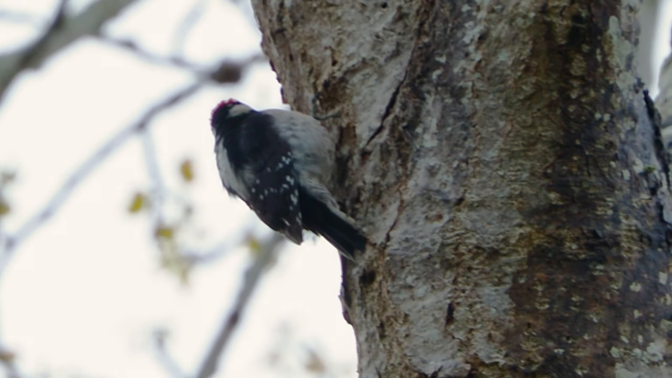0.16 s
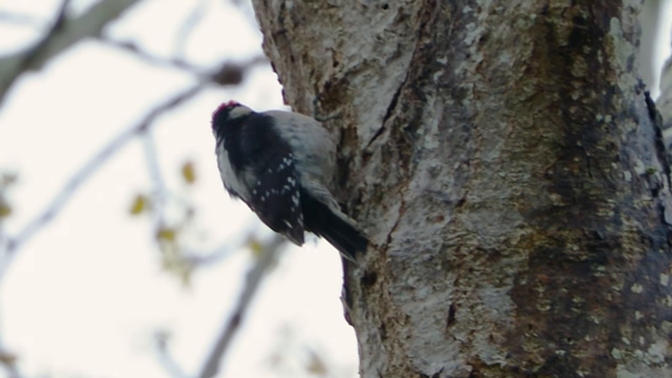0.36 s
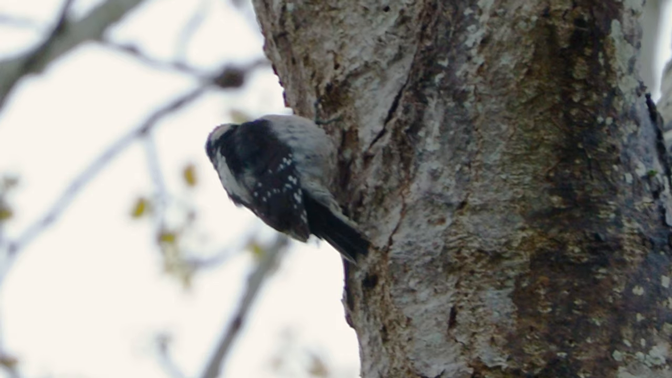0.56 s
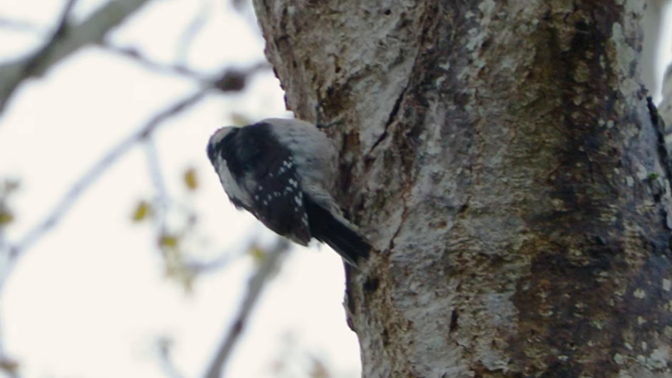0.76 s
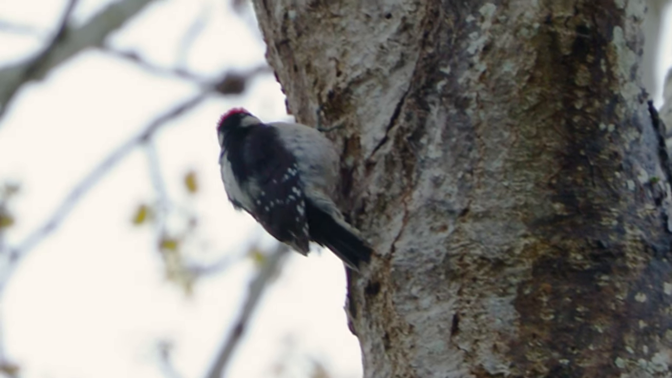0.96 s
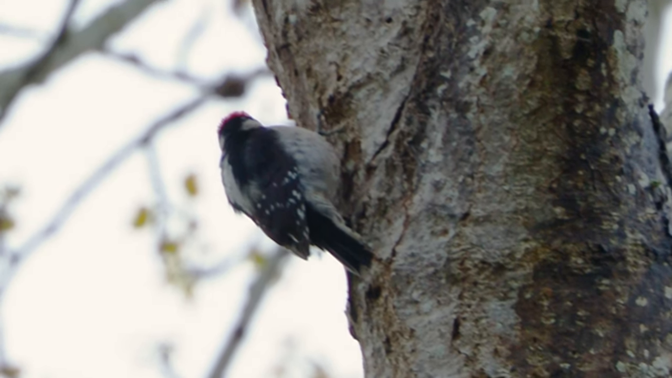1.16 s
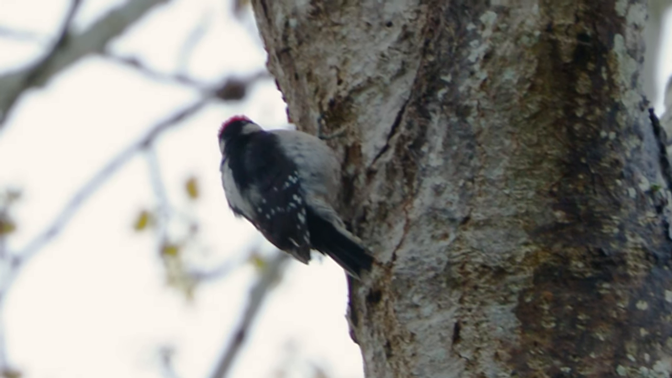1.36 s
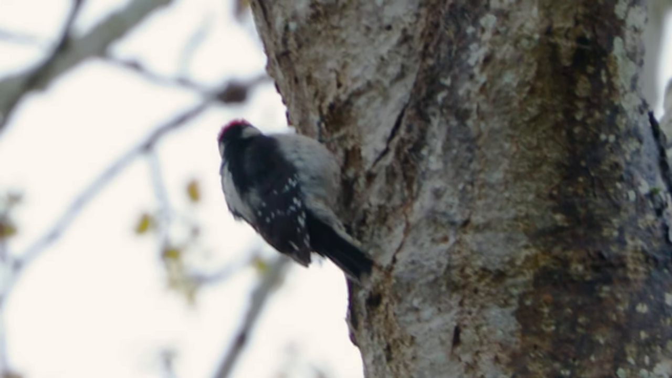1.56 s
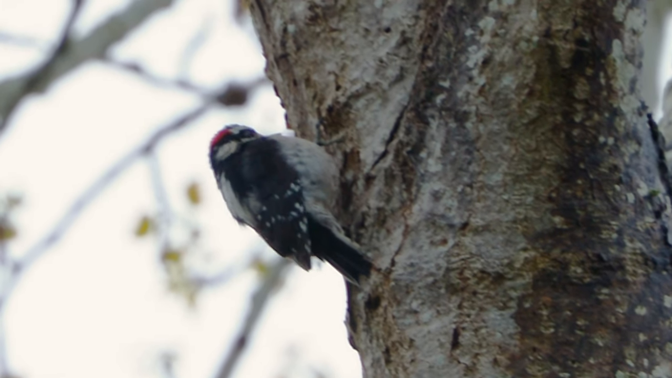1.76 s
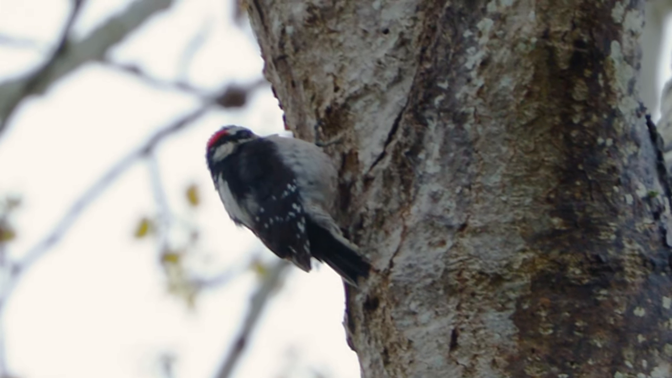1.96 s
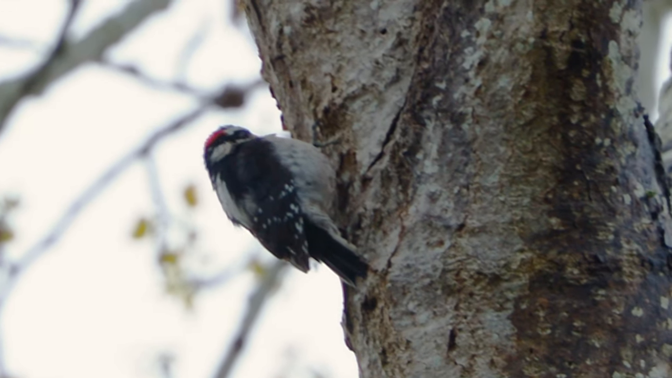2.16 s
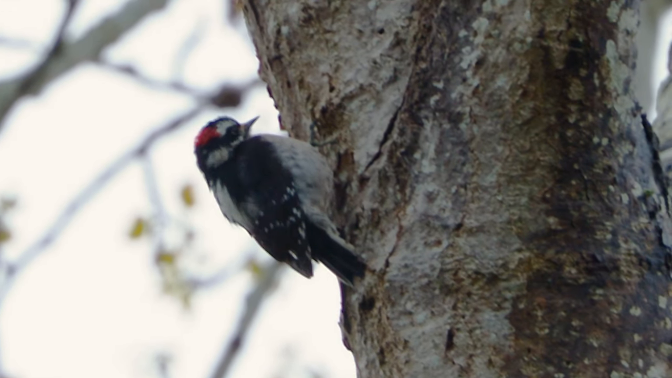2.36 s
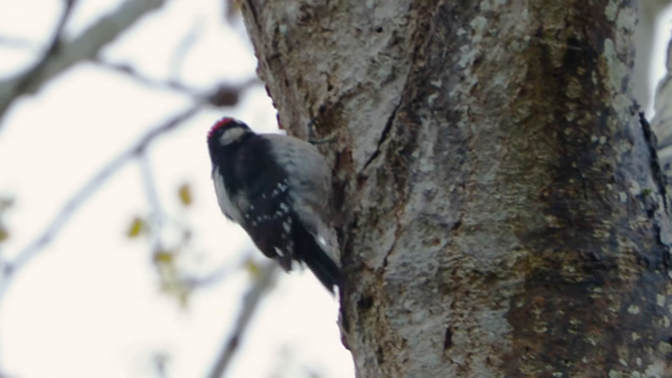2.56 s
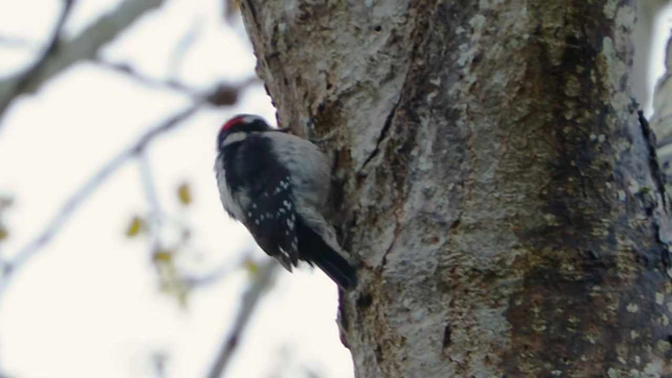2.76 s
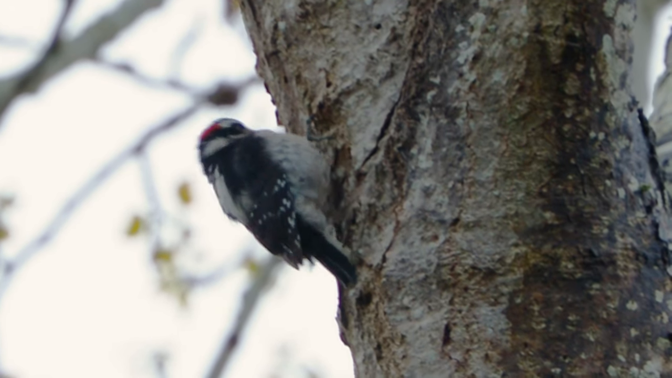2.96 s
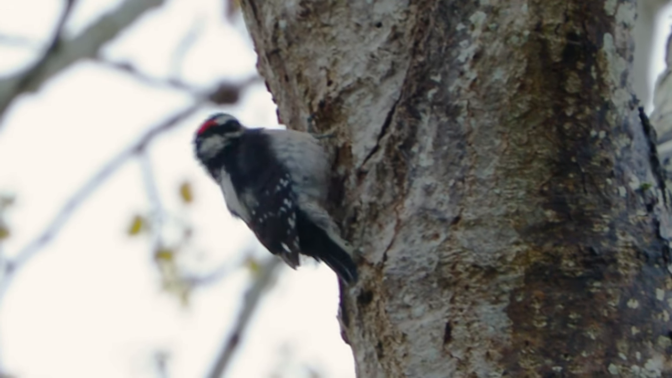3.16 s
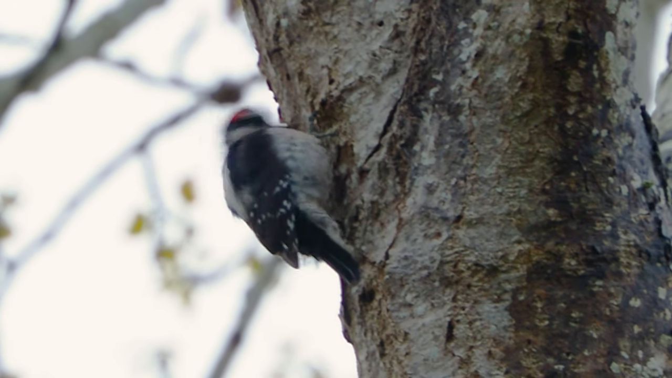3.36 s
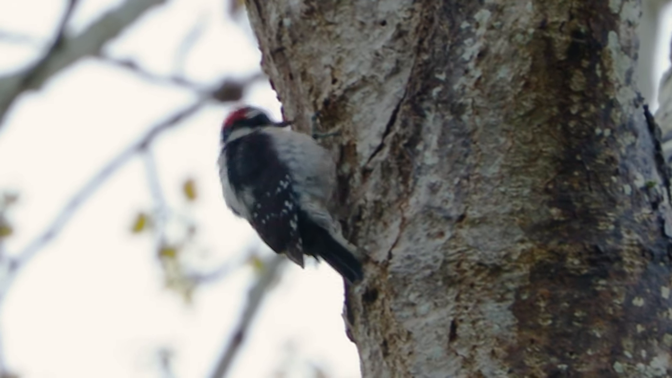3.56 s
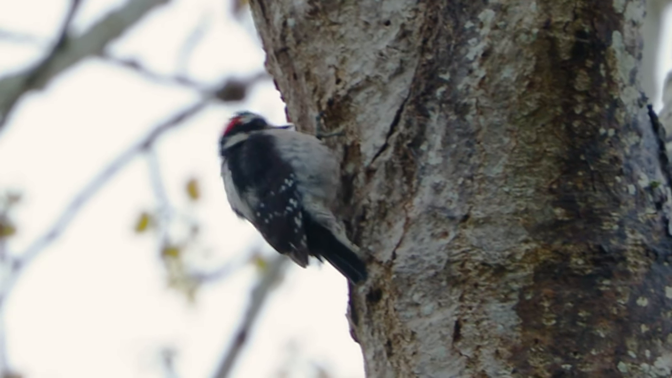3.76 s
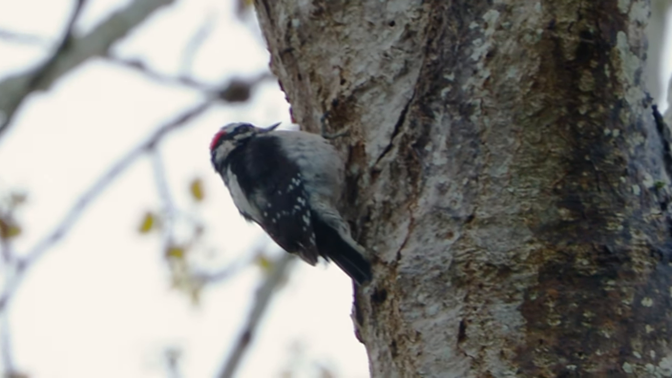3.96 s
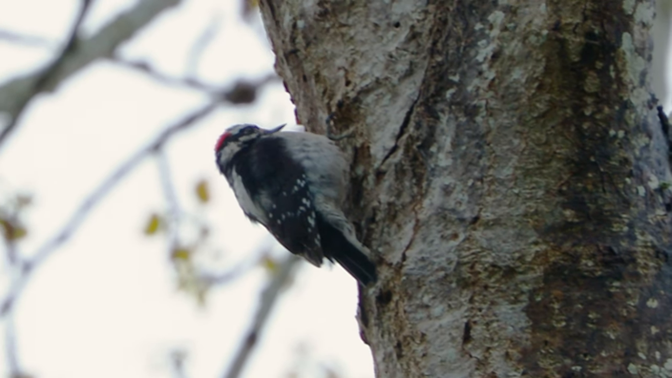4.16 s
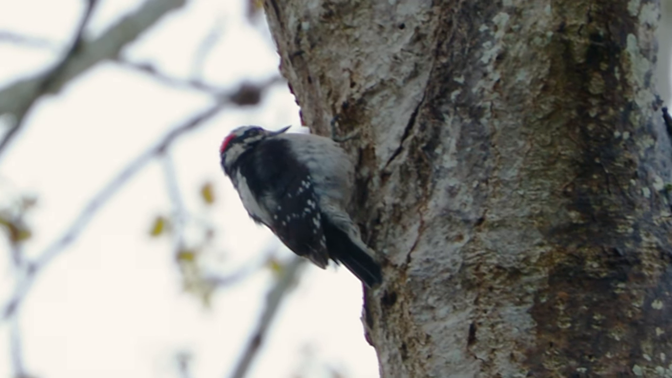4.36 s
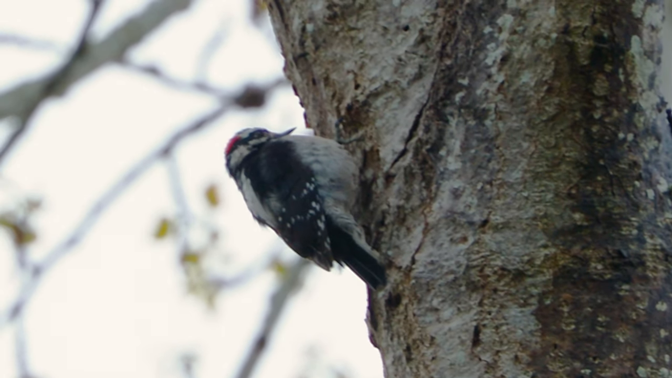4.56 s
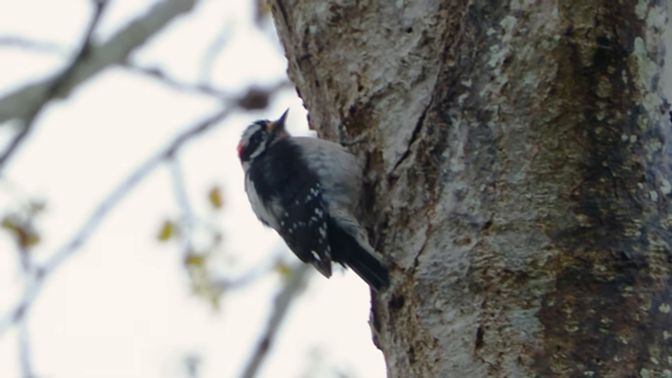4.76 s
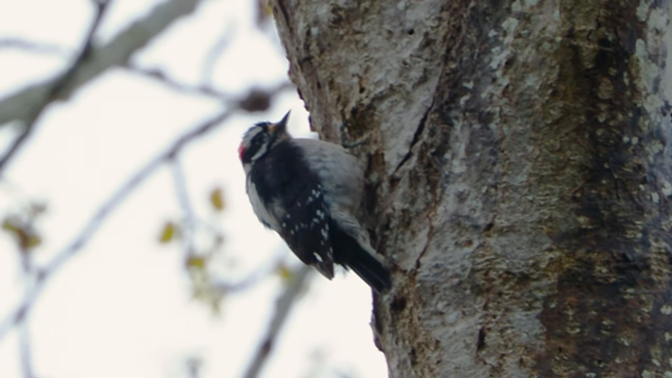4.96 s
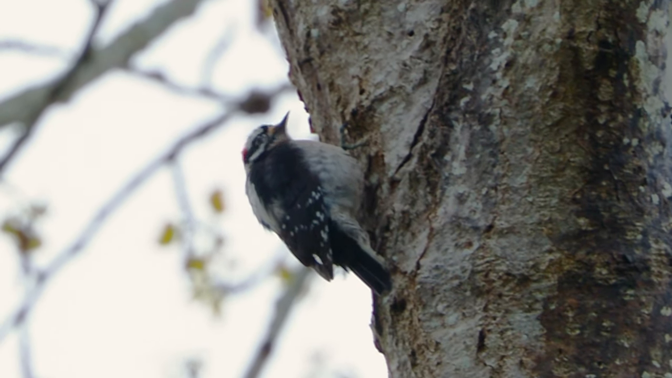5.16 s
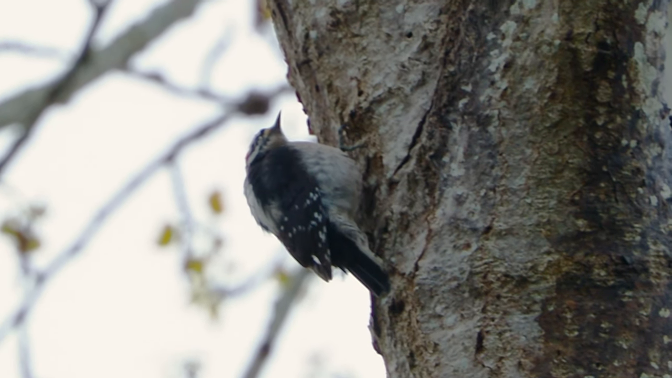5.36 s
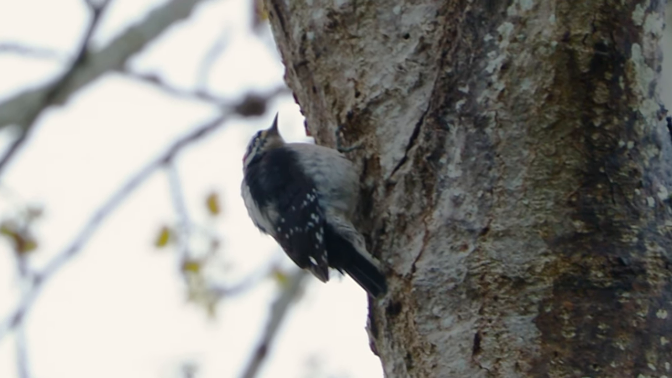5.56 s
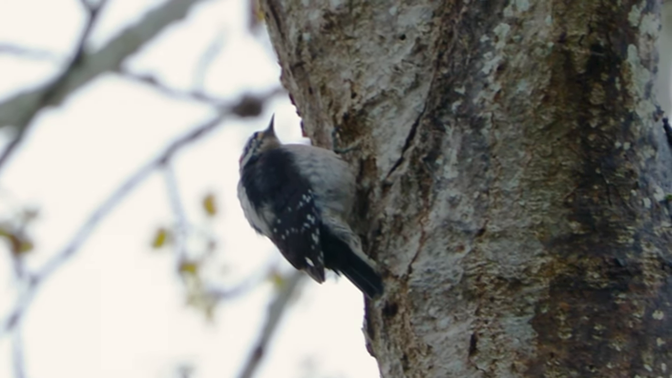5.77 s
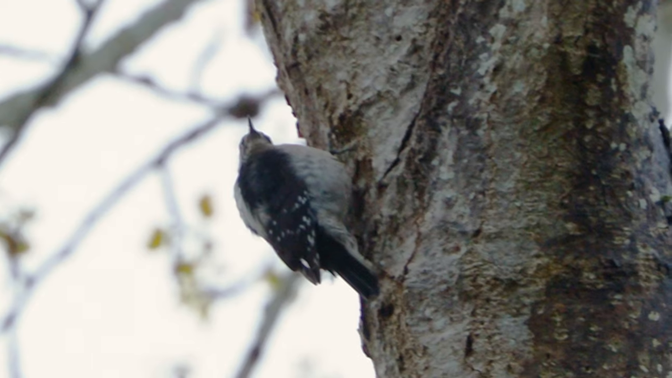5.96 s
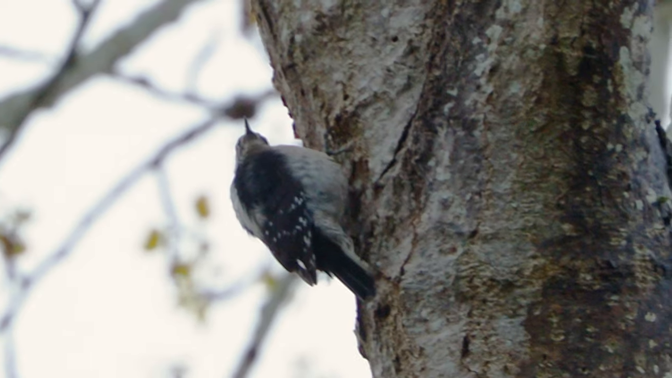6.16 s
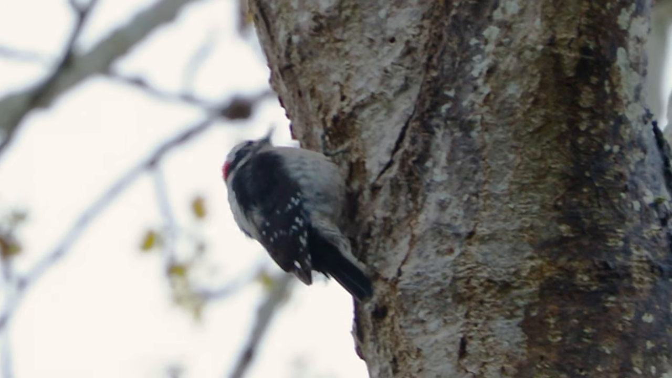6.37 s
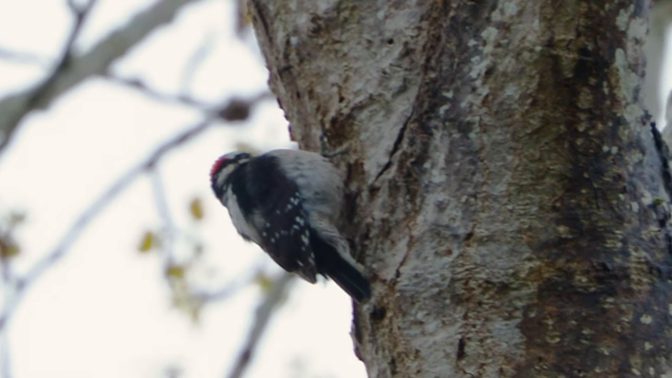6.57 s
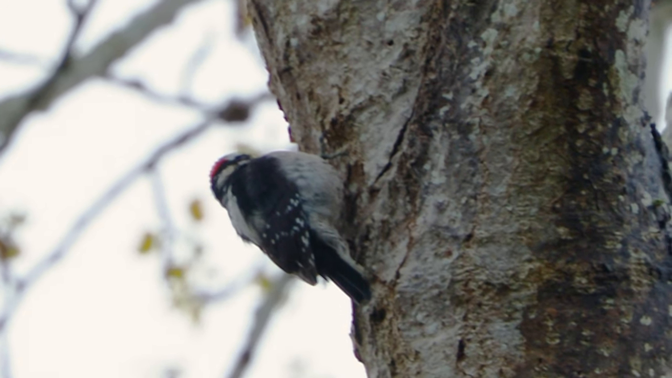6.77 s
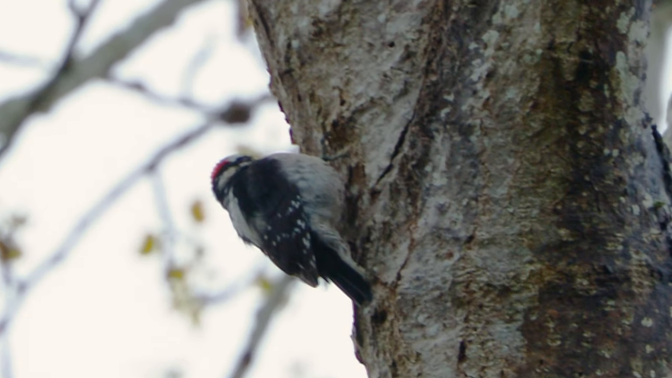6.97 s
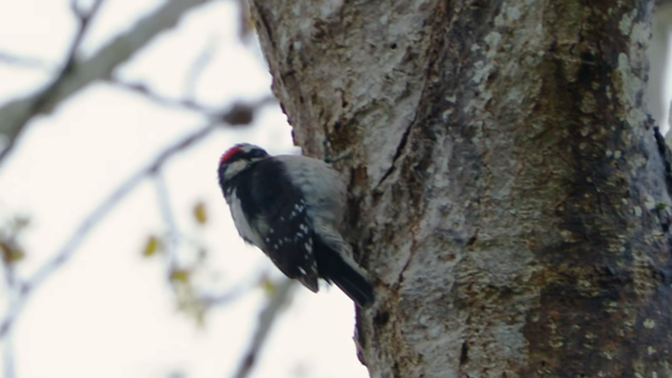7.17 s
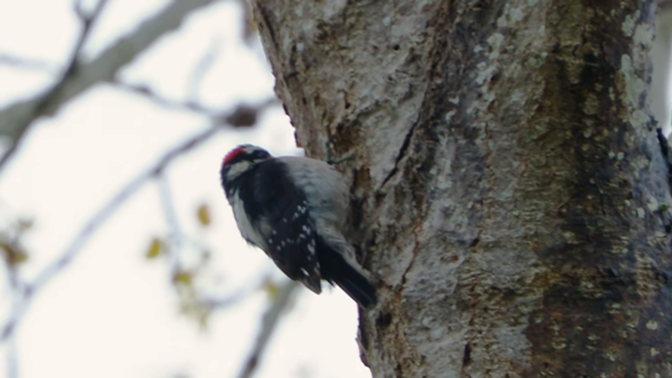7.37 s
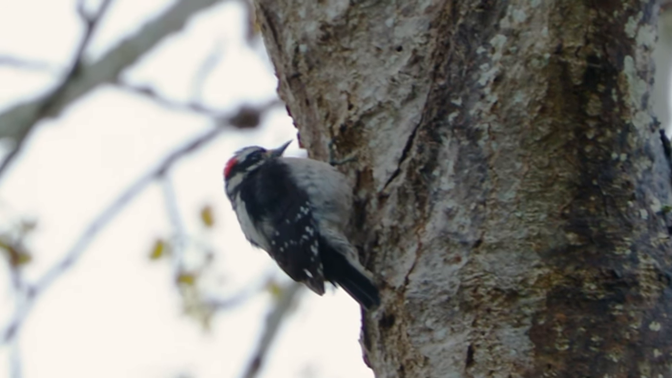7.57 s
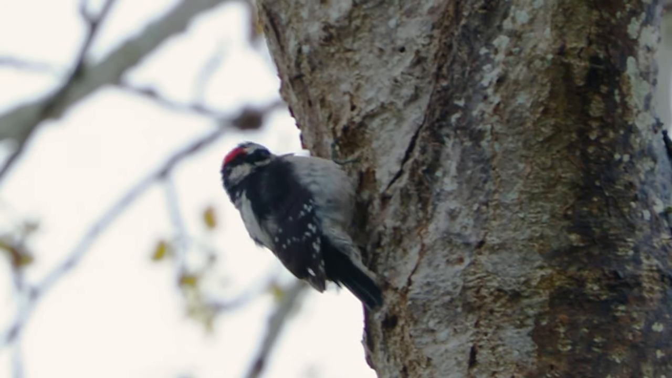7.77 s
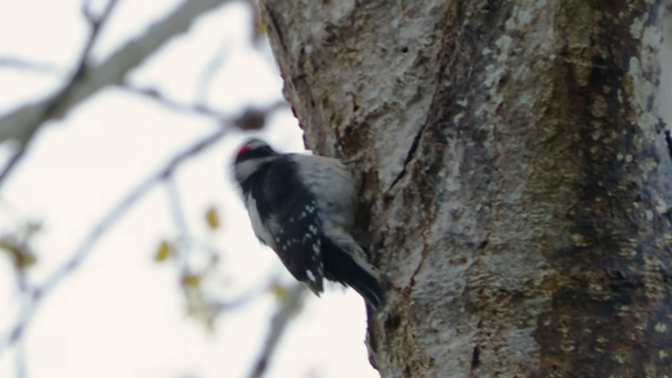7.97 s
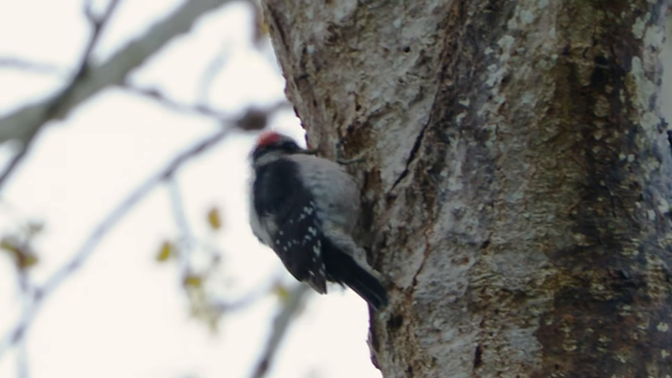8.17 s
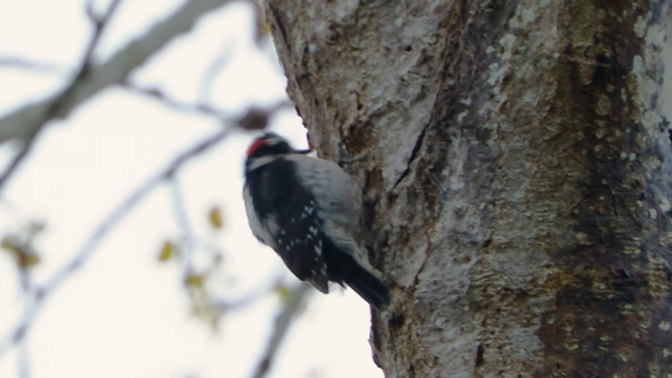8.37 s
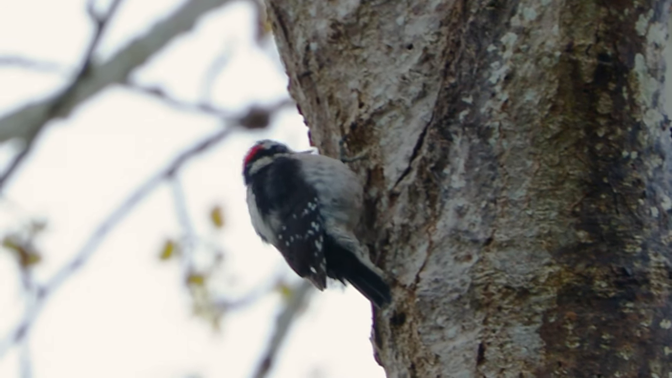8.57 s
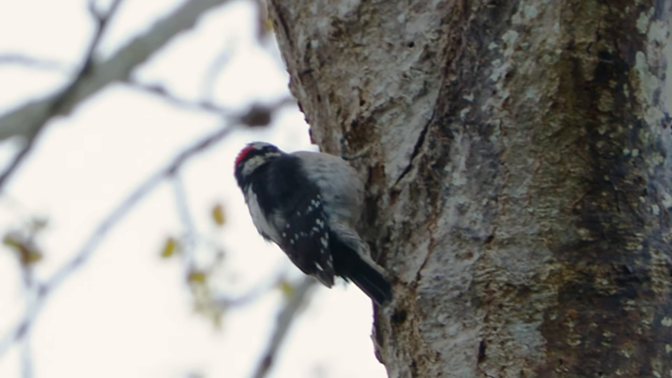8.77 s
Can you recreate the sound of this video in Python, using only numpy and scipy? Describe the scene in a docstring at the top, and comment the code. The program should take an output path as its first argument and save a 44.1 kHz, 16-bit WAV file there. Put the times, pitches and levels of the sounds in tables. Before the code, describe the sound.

A low rumble of distant traffic and a soft hiss of outdoor air run throughout, the traffic swelling slightly around 2.5 seconds. Small birds give faint high chips and whistles all along, with occasional tiny twig ticks. A far bird gives a faint, hoarse rising scream at 0.4 seconds, and there is brief twittering near 2.5. At 2.9 seconds a small woodpecker drums loudly on a resonant trunk for about a second, roughly sixteen blows a second, echoing briefly among the trees. Another faint scream follows at 4 seconds, and claws scrape softly on bark at 4.6. A dry trill at 5.2 leads into a clear rising note at 5.8 and a hoarse song of four repeated syllables until about 7 seconds. At 8 seconds the woodpecker drums a shorter roll, and a last distant scream rises behind it at 8.5.

```python
"""Distant traffic rumbles throughout. A twig ticks, a far bird screams, and songbirds chip, whistle and
twitter. Near 3 s a small woodpecker drums on a resonant spot of a trunk, sixteen blows a second: each
rings the wood, comes back from nearby surfaces and scatters among the trees. A second scream follows,
claws scrape the bark, and a dry trill leads into a hoarse song near 6 s. Near 8 s the woodpecker drums a
shorter roll, and a last scream rises behind it."""
import sys
import numpy as np
from scipy import signal
from scipy.fft import rfft, irfft, next_fast_len
from scipy.io import wavfile
from scipy.ndimage import uniform_filter1d

SR = 44100
rng = np.random.default_rng(int(sys.argv[2]) if len(sys.argv) > 2 else 0)


def inscribe(sig):
    """Save sig as 16-bit PCM at rate SR to the path in sys.argv[1].

    A 1-D sig is mono; a 2-D sig holds one channel per row.
    Samples are clipped to [-1, 1] before scaling.
    """
    pcm = np.round(np.clip(np.atleast_2d(sig).T, -1, 1) * 32767)
    wavfile.write(sys.argv[1], SR, pcm.astype(np.int16))


N = 388521


def undb(db):
    """Decibels to gain."""
    return 10 ** (np.asarray(db) / 20)


def level(x, db):
    """Scale to an rms level."""
    return x * undb(db) / np.sqrt(np.mean(x ** 2))


def clock(length):
    """Sample times of a sound, in seconds."""
    return np.arange(int(length * SR)) / SR


def decay(t, t60):
    """Envelope that falls 60 dB in t60 seconds."""
    return undb(-60 * t / t60)


def arch(t):
    """Envelope that swells and fades over a note."""
    return np.sin(np.pi * t / (t[-1] + 1 / SR))


def walk(rate, size):
    """Smooth random wander with a spread near 1."""
    hold = int(SR / rate)
    return uniform_filter1d(np.repeat(rng.standard_normal(size // hold + 1), hold), hold)[:size]


def tone(hz, waver):
    """A bird's voice: near pure when the pitch wavers little, hoarse when it wavers much."""
    return np.sin(2 * np.pi * np.cumsum(hz * (1 + waver * walk(900, len(hz)))) / SR)


def settle(t, start_hz, end_hz, glide):
    """A pitch that leaves its start quickly and levels off."""
    return end_hz + (start_hz - end_hz) * np.exp(-t / glide)


def s_bend(along, start_hz, end_hz, turn, width):
    """A pitch that dwells, bends and levels off; turn and width are shares of the note."""
    return start_hz + (end_hz - start_hz) / (1 + np.exp(-(along - turn) / width))


def add(out, start, sound, pan_db=0):
    """Mix a sound into a stereo track; pan is left minus right."""
    i = int(start * SR)
    part = np.atleast_2d(sound)[:, :max(N - i, 0)]
    out[:, i:i + part.shape[1]] += part * undb(np.array([[pan_db], [-pan_db]]) / 2)


def butter(x, hz, kind, order=2):
    """Butterworth filter."""
    return signal.sosfilt(signal.butter(order, hz, kind, fs=SR, output="sos"), x)


def colour(x, points, skirt_db=0):
    """EQ through (f/Hz, gain/dB) points, falling by skirt_db an octave beyond the ends."""
    size = next_fast_len(x.shape[-1])
    octave = np.log2(np.maximum(np.arange(size // 2 + 1) * SR / size, 1))
    hz, db = np.transpose(points)
    outside = np.abs(octave - np.clip(octave, np.log2(hz[0]), np.log2(hz[-1])))
    gain = undb(np.interp(octave, np.log2(hz), db) - skirt_db * outside)
    return irfft(rfft(x, size) * gain, size)[..., :x.shape[-1]]


def stereo_width(x, side_eq):
    """EQ the side signal: long waves reach both ears alike."""
    side = colour((x[0] - x[1]) / 2, side_eq)
    return x.mean(axis=0) + np.array([side, -side])


def from_right(x, samples):
    """Sound from the right reaches the left ear a little later."""
    return np.array([np.pad(x[0], (samples, 0))[:N], x[1]])


def trees(x, t60, wet_db, onset=.0015):
    """Reverb from trunks and branches: a fading cloud of echoes, different at each ear."""
    t = clock(1.2)
    fade_in = 1 - np.exp(-(t / onset) ** 2)
    cloud = rng.standard_normal((2, len(t))) * decay(t, t60) * fade_in
    cloud /= np.sqrt(np.sum(cloud ** 2, axis=1, keepdims=True))
    return undb(wet_db) * signal.fftconvolve(x, cloud, axes=1)[:, :N]


# stereo width of the ambience: f/Hz, side gain/dB
BED_WIDTH = [(60, -24.5), (110, -27), (200, -12), (380, -7.5), (700, -11.5), (1290, -12), (2380, 1.5),
             (4400, 4), (8120, 0), (15000, 3)]

def noise_bed(eq, skirt_db, side_db=0):
    """Shaped stereo noise with its mid signal at unit rms."""
    noise = colour(rng.standard_normal((2, N)), eq, skirt_db)
    bed = stereo_width(noise, [(hz, db + side_db) for hz, db in BED_WIDTH])
    return bed / bed.mean(axis=0).std()


# EQ of the low rumble and of the road noise: f/Hz, gain/dB
RUMBLE_EQ = [(11, -62), (18, -8.5), (38, 1.5), (73, 1), (92, -1), (180, -16.5), (230, -39), (400, -120)]
ROAD_EQ = [(94, -39), (160, 1.5), (172, -9.5), (199, -2), (307, -2.5), (366, -1.5), (475, -7.5),
           (615, -1.5), (780, -2), (1000, 1), (1200, -0.5), (1900, -26.5), (2470, -51), (4180, -120)]
# fader ride as a vehicle passes and recedes: t/s, level/dB
TRAFFIC_RIDE = [(0.0, -44.5), (1.2, -44.5), (2.01, -42.5), (2.6, -40.5), (3.72, -48), (4.97, -46.5),
                (7.23, -49.5), (8.8, -48.5)]

def traffic(split_hz=620, flicker_db=.83, tyre_follow=.22):
    """Far traffic to the right: throbbing rumble, engines that swell and recede, and tyre wash."""
    rumble = noise_bed(RUMBLE_EQ, skirt_db=6) * undb(-35.5 + walk(8.9, N))
    road = noise_bed(ROAD_EQ, skirt_db=22, side_db=-3)
    ride_db = np.interp(np.arange(N) / SR, *np.transpose(TRAFFIC_RIDE))
    engines = level(butter(road, split_hz, "low", order=3), 2)
    engines *= undb(ride_db + flicker_db * walk(8, N))
    tyres = level(butter(road, split_hz, "high", order=3), -50)
    tyres *= undb(tyre_follow * (ride_db - ride_db.mean()) + flicker_db * walk(6.5, N))
    return from_right(rumble + engines + tyres, samples=5)


# EQ of the outdoor air: f/Hz, gain/dB
AIR_EQ = [(880, -11.5), (1500, 1), (1880, -9), (2690, -4.5), (4200, -11), (4780, -11.5), (5490, -13.5),
          (9010, -17.5), (15100, -23.5), (16000, -17.5)]

def air():
    """A soft, steady hiss all round."""
    return noise_bed(AIR_EQ, skirt_db=14) * undb(-59.5)


# dry ticks: t/s, low edge/Hz, high edge/Hz, level/dB, t60/s
TICK_CUES = [(.106, 5500, 12000, -49, 0.0089), (2.578, 7000, 14000, -47, .006),
             (3.7447, 14500, 16400, -37, .008), (3.7448, 7500, 14000, -43, 0.007),
             (4.621, 7000, 13000, -44, 0.0069), (5.345, 8000, 13000, -51, .006),
             (5.785, 6500, 11000, -46, 0.0068), (7.854, 8000, 13000, -51, .006)]

def ticks():
    """Bark and twigs snap in tiny bursts of bright noise."""
    out, t = np.zeros((2, N)), clock(.034)
    for start, low_hz, high_hz, db, t60 in TICK_CUES:
        grain = butter(rng.standard_normal((2, len(t))), [low_hz, high_hz], "band")
        add(out, start, level(grain, db) * decay(t, t60))
    return out + trees(out, t60=.1, wet_db=-8)


# rising screams: t/s, length/s, top fundamental/Hz, level/dB, rasp trim/dB, waver/share of pitch
SCREAM_CUES = [(0.418, 0.56, 1339, -57.5, -5, .014), (3.953, 0.58, 1320, -57, -1.5, 0.025),
               (8.49, .53, 1296, -57, -6, 0.0177)]

def screams(low_hz=945, droop=.045, second_voice=.95):
    """A far bird's hoarse cry slides up in two close voices and droops as it fades."""
    out = np.zeros((2, N))
    harmonics = [(2, -2, .6), (3, 0, 1.1), (4, -13, 1.6)]  # multiple, level/dB, waver factor
    for start, length, top_hz, db, rasp_db, waver in SCREAM_CUES:
        t = clock(length)
        along = t / length
        hz = s_bend(along, low_hz, top_hz, turn=.33, width=.115)
        hz *= 1 - droop * np.clip((along - .75) / .25, 0, 1) ** 2  # sags in the last quarter
        hz *= 1 + .012 * walk(30, len(t))
        rasp = butter(rng.standard_normal(len(t)), [2500, 4300], "band", order=3)
        cry = level(rasp, rasp_db - 1)
        for multiple, part_db, roughness in harmonics:
            cry += undb(part_db) * tone(multiple * hz, roughness * waver)
        cry += undb(-3) * tone(3 * hz * second_voice, 2 * waver)  # just under the strongest harmonic
        add(out, start, undb(db) * arch(t) ** .63 * cry, pan_db=4)
    out = butter(out, 2400, "high", order=6)
    return undb(-2) * out + trees(out, t60=1, wet_db=-1.5)


# thin chips: t/s, end pitch/Hz, glide time/s, level/dB, pan/dB
CHIP_CUES = [(.858, 8000, .022, -64, -2), (1.333, 7650, .03, -60, -6), (1.698, 7650, 0.031, -57, -4),
             (2.01, 7170, 0.017, -57.5, 0), (2.313, 7600, 0.014, -57, -3), (3.53, 7300, 0.018, -60, 0),
             (5.07, 8150, .02, -63, 3), (5.357, 7600, .02, -58.5, 3), (5.655, 8000, 0.024, -59, 6),
             (5.828, 8200, .02, -62, 7), (6.705, 7750, .02, -61, 4), (7.735, 7200, 0.011, -60, -10),
             (7.97, 7550, 0.018, -65, -6)]

def chips(start_hz=9200):
    """Very high notes that drop fast and level off, each with a slapback."""
    out, t = np.zeros((2, N)), clock(.055)
    for start, end_hz, glide, db, pan_db in CHIP_CUES:
        voice = tone(settle(t, start_hz, end_hz, glide), waver=.006)
        add(out, start, undb(db) * np.sqrt(arch(t)) * voice, pan_db)
    slapback = np.zeros((2, N))
    add(slapback, .027, undb(-9) * out)
    return out + slapback + trees(out, t60=.55, wet_db=-4)


# whistles: t/s, length/s, start pitch/Hz, end pitch/Hz, waver/share of pitch, level/dB, pan/dB
WHISTLE_CUES = [(1.635, 0.033, 4580, 4490, .004, -60, -2), (1.548, .06, 6350, 5900, 0.045, -63.5, -11),
                (1.937, 0.12, 4700, 4460, .005, -64.5, -12), (1.975, .05, 5700, 5880, 0.04, -60, -8),
                (2.324, 0.11, 4570, 4500, 0.004, -62.5, -5), (2.752, 0.11, 6340, 5960, 0.036, -61, -3),
                (2.852, .7, 6950, 7000, .042, -68, 0), (4.205, .025, 2850, 2790, .006, -56, -4),
                (4.558, .03, 6300, 5950, .008, -66, -2), (4.89, 0.038, 1830, 2090, 0.1, -54, -2),
                (4.872, 0.29, 5160, 7570, 0.0072, -59, -10), (5.263, 0.028, 1830, 2110, 0.059, -52, 0),
                (5.705, 0.017, 3130, 3010, .005, -49.5, 3), (5.708, 0.011, 6430, 5820, .005, -53, -4),
                (7.615, 0.38, 5490, 5530, 0.0256, -64.5, 3), (8.066, 0.13, 5800, 6150, 0.041, -63, 0),
                (8.445, 0.48, 6900, 6820, .017, -70.5, -15)]

def whistles(glide_share=.27):
    """Single bird notes, each sliding onto its final pitch."""
    out = np.zeros((2, N))
    for start, length, start_hz, end_hz, waver, db, pan_db in WHISTLE_CUES:
        t = clock(length)
        hz = settle(t, start_hz, end_hz, glide_share * length)
        add(out, start, undb(db) * arch(t) * tone(hz, waver), pan_db)
    return out + trees(out, t60=.53, wet_db=1.5)


# bouts of far twittering: t/s, length/s, centre pitch/Hz, level/dB
TWITTER_CUES = [(2.428, 0.14, 4820, -58), (2.58, 0.14, 8160, -64), (2.659, 0.4, 3770, -57.5)]

def twitter(notes_per_s=45, spread_oct=.074, sweep_oct=.156):
    """Quick falling notes of scattered pitch, blurred by their echoes."""
    out, t = np.zeros((2, N)), clock(.021)
    for start, length, hz, db in TWITTER_CUES:
        for k, (pitch, slope) in enumerate(rng.standard_normal((int(length * notes_per_s), 2))):
            octaves = spread_oct * pitch - sweep_oct * abs(slope) * (t / t[-1] - .5)
            add(out, start + k / notes_per_s, undb(db) * arch(t) * tone(hz * 2 ** octaves, waver=.03))
    return trees(out, t60=.15, wet_db=1)


# drum rolls: t/s, blows, first gap/s, gap growth per blow/s, force of the last blow/dB
DRUM_ROLLS = [(2.908, 18, .059867, .000263, -5), (7.949, 13, .061004, .000202, -3)]

def blows(jitter_s=.0003):
    """Time and force of every blow: a roll gathers force, slows a little unevenly and slackens."""
    for start, count, gap, slowing, end_db in DRUM_ROLLS:
        k = np.arange(count)
        times = start + gap * k + slowing * k * (k - 1) / 2 + jitter_s * rng.standard_normal(count)
        force_db = -5.5 * np.exp(-k / 1.3) + end_db * np.exp(-k[::-1] / 1.23)
        yield from zip(times, force_db + .4 * rng.standard_normal(count))


# modes of the trunk: f/Hz, level/dB, t60/s, pan/dB
TRUNK_MODES = [(705, -12.5, .018, 0), (988, 2.8, .025, -2.5), (1200, -10, .022, -5), (1345, -9.5, .022, -7),
               (1960, -15.5, .02, 2), (2150, -5.5, .009, 2), (2400, -7.5, .005, .5), (2985, -10.5, .012, 1),
               (3155, -10.5, .013, 0), (3420, -25, .022, 0), (4135, -37, .02, -1.5),
               (5160, -27, .015, -7.5)]

def trunk_knocks(ring_db=-18, crack_db=-47, clatter_db=-30, contact_s=.0001):
    """Dry knocks and clatter: the bill hits one spot, and a harder blow lifts the upper modes."""
    hz, db, t60, pan_db = np.transpose(TRUNK_MODES)[:, :, None]
    polarity = -(-1) ** np.arange(len(hz))[:, None]  # neighbouring modes swing in opposite senses
    upper = np.clip(np.log2(hz / hz[1]), 0, 1)
    ears = undb(np.array([[.5], [-.5]]) * pan_db.T)  # each mode radiates in its own direction
    t, knocks, clatter = clock(.08), np.zeros((2, N)), np.zeros((2, N))
    press = 1 - np.exp(-t / contact_s)  # the bill takes a moment to press in
    burst = rng.standard_normal((2, len(t))) * decay(t, .02)
    for start, force_db in blows():
        bite_db = 1.5 + .55 * force_db  # a stronger blow bites harder
        detune, flutter = rng.standard_normal((2, len(hz), 1))
        gain = undb(db + upper * (bite_db + .9 * flutter))
        ring = polarity * gain * decay(t, t60) * np.sin(2 * np.pi * hz * (1 + .004 * detune) * t)
        add(knocks, start, undb(ring_db + force_db) * press * (ears @ ring))
        crack = butter(rng.standard_normal((2, len(t))), 5700, "low") * decay(t, .15)
        add(knocks, start, undb(crack_db + force_db + bite_db) * press * crack)
        add(clatter, start, undb(clatter_db + force_db) * burst)
    return butter(knocks, 480, "high"), clatter


# early reflections: delay/s, level/dB
NEAR_ECHOES = [(.00497, -22), (.008, -2.7), (.00963, -16), (.0141, -19), (.0238, -17), (.0265, -17),
               (.0316, -19.5), (.0383, -23)]
# EQ of the knock that reaches the farther trunks: f/Hz, gain/dB
FAR_EQ = [(800, -9), (1000, -14), (1350, -11), (1700, -3), (2200, -3), (3100, -11), (5000, -3)]

def woodpecker():
    """The knocks bounce off nearby surfaces and, with the clatter sent sideways, off farther trunks."""
    knocks, clatter = trunk_knocks()
    near = knocks.copy()
    dull = colour(knocks, [(1100, 1), (2200, -5.5), (3200, -13.5)])  # rough surfaces return little treble
    for delay, db in NEAR_ECHOES:
        add(near, delay, undb(db) * dull)
    clatter_eq = [(680, 23), (850, 3), (1130, 28), (1500, 13.5),
                  (2200, -5), (2950, 4), (4000, -1), (5500, -21)]
    send = colour(knocks, FAR_EQ) + colour(clatter, clatter_eq, skirt_db=28)
    tail = trees(send, t60=.5, wet_db=-3.5, onset=.016)
    return from_right(near, samples=2) + stereo_width(tail, [(900, -11), (2200, 1.5)])


# claw scrapes: t/s, length/s, low edge/Hz, high edge/Hz, level/dB
SCRAPE_CUES = [(4.556, 0.017, 1550, 2900, -43.5), (4.571, 0.041, 2100, 3300, -50.5),
               (4.606, 0.019, 2470, 3600, -53)]

def scrapes():
    """Claws shift on the bark: soft, grainy rubs."""
    out = np.zeros((2, N))
    for start, length, low_hz, high_hz, db in SCRAPE_CUES:
        t = clock(length)
        grains = rng.standard_normal((2, len(t))) * rng.exponential(size=len(t))
        rub = butter(grains, [low_hz, high_hz], "band", order=3)
        add(out, start, arch(t) * level(rub, db))
    return out + trees(out, t60=.2, wet_db=-3)


def trill(start=5.205, period=.059, beats=10, rise_db=4, pan_db=-3):
    """A dry swelling trill, blurred by distance: each beat is a rasp and a quick downward flick."""
    out, rasp_t, flick_t = np.zeros((2, N)), clock(.045), clock(.009)
    for k in range(beats):
        swell_db = rise_db * k / beats
        rasp = arch(rasp_t) * tone(np.full(len(rasp_t), 5700), waver=.09)
        add(out, start + k * period, undb(-59 + swell_db) * rasp, pan_db)
        flick = arch(flick_t) * tone(np.geomspace(8000, 5400, len(flick_t)), waver=.063)
        add(out, start + (k + .38) * period, undb(-58 + swell_db) * flick, pan_db)
    return out + trees(out, t60=.3, wet_db=3, onset=.015)


# first note of the song: length/s, start pitch/Hz, end pitch/Hz, level/dB, fade/dB
OPENING_NOTE = (.15, 3310, 3990, -40, -14)

def song_opening(start=5.811):
    """A clear note that bends upward as it fades."""
    length, start_hz, end_hz, db, fade_db = OPENING_NOTE
    out, t = np.zeros((2, N)), clock(length)
    voice = tone(s_bend(t / length, start_hz, end_hz, turn=.38, width=.167), waver=.0092)
    add(out, start, undb(db + fade_db * t / length) * np.sqrt(arch(t)) * voice, pan_db=-4)
    return out + trees(out, t60=.42, wet_db=-.5)


# a long slur and a three-part hook: offset/s, length/s, start pitch/Hz, end pitch/Hz, level/dB, swell/dB
SYLLABLE_NOTES = [(0, .105, 7060, 4750, -53.5, 5), (0.11, 0.025, 3230, 3340, -47.5, -3),
                  (0.132, .016, 3300, 3560, -39, -1.5), (.153, 0.01307, 3200, 2830, -50, 2.5)]
# buzzes: t/s, length/s, f/Hz, vibrato depth/Hz, vibrato rate/Hz, level/dB
BUZZ_CUES = [(5.998, 0.16, 6480, 450, 120, -56), (6.157, 0.49, 7160, 300, 91, -60.5)]

def song(start=6.03, period=.2248, syllables=4, pan_db=-4):
    """One hoarse slurred syllable repeats at an even pace, with buzzes over it."""
    out = np.zeros((2, N))
    for k in range(syllables):
        for offset, length, start_hz, end_hz, db, swell_db in SYLLABLE_NOTES:
            t = clock(length)
            envelope = undb(db + swell_db * t / length) * np.sqrt(arch(t))
            slur = tone(np.geomspace(start_hz, end_hz, len(t)), waver=.023)
            add(out, start + k * period + offset, envelope * slur, pan_db)
    for onset, length, hz, depth_hz, rate_hz, db in BUZZ_CUES:
        t = clock(length)
        buzz = tone(hz + depth_hz * np.sin(2 * np.pi * rate_hz * t), waver=.02)
        add(out, onset, undb(db) * np.sqrt(arch(t)) * buzz, pan_db)
    near = trees(out, t60=.13, wet_db=-3.5)
    bright_tail = trees(butter(out, 4300, "high"), t60=.78, wet_db=3)  # twigs scatter high notes most
    return undb(-1) * out + near + bright_tail


def scene():
    """The ambience, with the birds and small noises in order of entry."""
    return (traffic() + air() + ticks() + screams() + chips() + whistles() + twitter()
            + woodpecker() + scrapes() + trill() + song_opening() + song())


def record(dry, top_hz=15900):
    """A steep low-pass on the whole mix."""
    return signal.sosfilt(signal.ellip(8, .2, 70, top_hz, fs=SR, output="sos"), dry)


dry = scene()
out = record(dry)
inscribe(out)
```